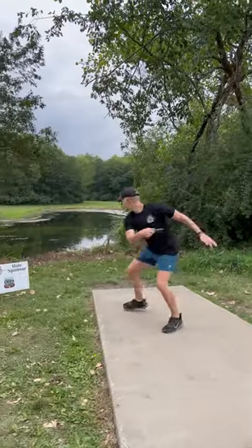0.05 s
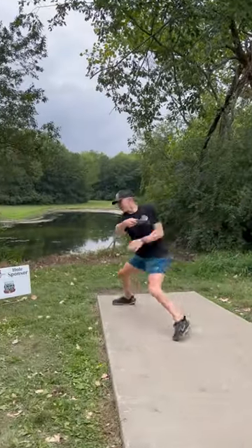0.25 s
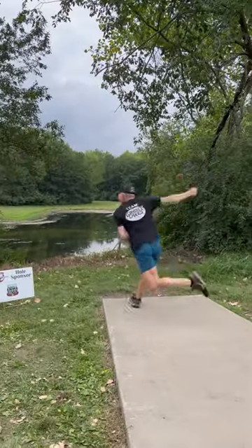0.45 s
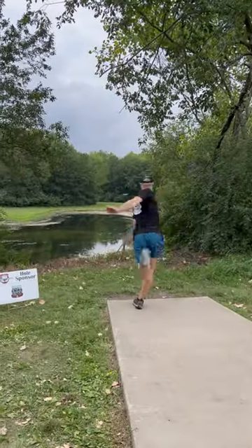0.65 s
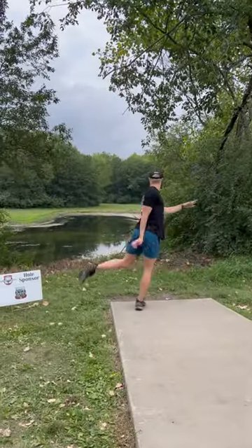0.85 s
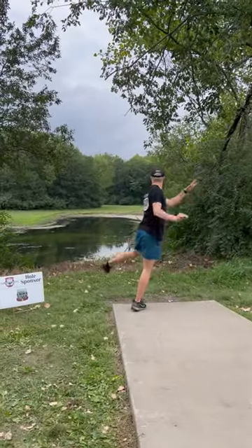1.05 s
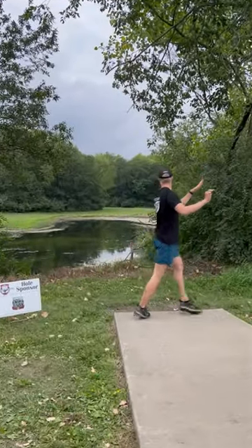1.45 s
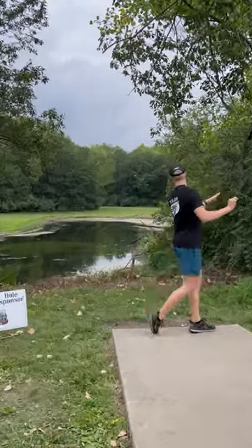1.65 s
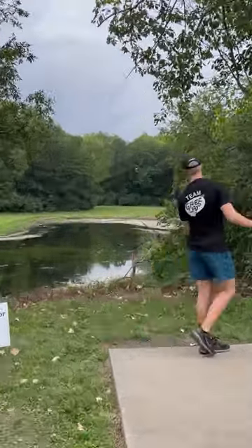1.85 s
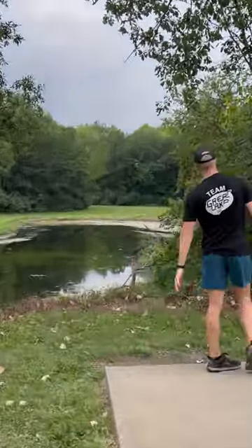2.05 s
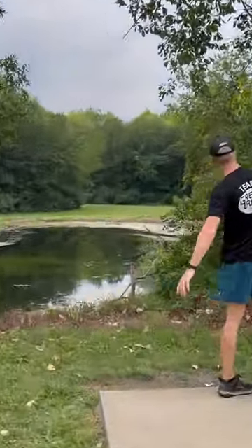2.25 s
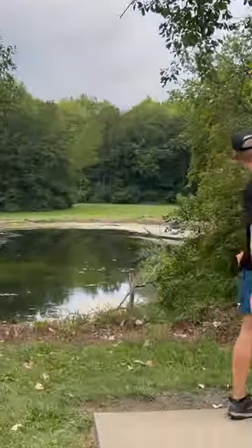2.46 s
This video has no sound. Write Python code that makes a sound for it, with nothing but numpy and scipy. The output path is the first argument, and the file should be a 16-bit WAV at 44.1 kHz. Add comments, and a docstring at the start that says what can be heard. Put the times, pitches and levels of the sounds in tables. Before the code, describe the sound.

A disc throw sounds close by outdoors: at 0.2 seconds a shoe slaps and thumps on concrete, scuffs grittily, and a loud, fast swish of clothing follows at 0.4. Another step slaps and scrapes at 1 second. Light steps and a faint squeak come around 1.5, with softer steps near 2.2. High crickets trill throughout, over a faint distant engine hum and soft moving air.

```python
"""Shoe slaps, gritty scuffs and one fast swish, then light steps and a squeak, over trilling crickets.
A disc thrower plants a foot on a concrete pad by a pond, drags a shoe, whips round and steps off.
Soles slap and thump, rubber rubs over sand, cloth flutters; ground and tree line scatter these sounds.
Cricket wing strokes fill one high band; a far engine hums under low rumble and moving air."""
import sys
import numpy as np
from scipy import signal
from scipy.fft import rfft, irfft, next_fast_len
from scipy.io import wavfile
from scipy.ndimage import map_coordinates

SR = 44100
rng = np.random.default_rng(int(sys.argv[2]) if len(sys.argv) > 2 else 0)


def wav_record(signal):
    """Record a signal, one row per channel, as 16-bit PCM in the file named by sys.argv[1]."""
    frames = np.transpose(np.atleast_2d(signal))
    bounded = np.clip(frames, -1, 1)
    # unit amplitude maps onto the largest positive 16-bit level
    quanta = np.round(bounded * 32767).astype(np.int16)
    wavfile.write(sys.argv[1], SR, quanta)


N = 110250


def amp(db):
    """Decibels to gain."""
    return 10 ** (np.asarray(db) / 20)


def unit(x):
    """Scale to rms 1."""
    return x / np.sqrt(np.mean(x ** 2) + 1e-20)


def along(points, hz):
    """Interpolate (frequency, value) points on a log axis."""
    freqs, values = np.transpose(points)
    return np.interp(np.log(np.maximum(hz, 1e-6)), np.log(freqs), values)


def clock():
    """Sample times [s]."""
    return np.arange(N) / SR


def curves(rows):
    """One value per sample for each column after the time."""
    times_s, *columns = np.transpose(rows)
    return [np.interp(clock(), times_s, column) for column in columns]


def wobble(knots_per_s):
    """Smooth random curve, rms near 1."""
    knots = rng.standard_normal(int(N * knots_per_s / SR) + 4)
    return map_coordinates(knots, [clock() * knots_per_s])


def swell(peak_s, rise_s, fall_s):
    """Bell envelope, peak 1."""
    t = clock() - peak_s
    return np.exp(-(t / np.where(t < 0, rise_s, fall_s)) ** 2)


def filtered(x, response):
    """Apply the gain response(hz)."""
    size = next_fast_len(N + SR // 2)
    return irfft(rfft(x, size) * response(np.fft.rfftfreq(size, 1 / SR)), size)[..., :N]


def noise(spectrum):
    """Coloured noise, rms 1."""
    return unit(filtered(rng.standard_normal(N), lambda hz: amp(along(spectrum, hz))))


def friction(spectrum, scale_hz=1):
    """Tiny random slips over smooth hiss, coloured, rms 1."""
    slips_per_s, slip_share = 3500, .4
    slips = unit(rng.standard_normal(N) * (rng.random(N) < slips_per_s / SR))
    drive = np.sqrt(slip_share) * slips + np.sqrt(1 - slip_share) * rng.standard_normal(N)
    return unit(filtered(drive, lambda hz: amp(along(spectrum, hz / scale_hz))))


def antiphase(x):
    """Stereo side signal."""
    return np.array([x, -x])


def panned(x, pan_db):
    """Pan by a nominal right-over-left level; the top treble stays central."""
    ratio = amp(pan_db)
    depth = [(1200, 1.6), (2000, .8), (3800, 1.2), (5800, 0)]  # (frequency [Hz], pan factor)
    side = filtered(x, lambda hz: (ratio - 1) / (ratio + 1) * along(depth, hz))
    return x - antiphase(side)


def air():
    """Soft wash of moving air, low outdoor rumble and dull rustling."""
    # spectra (frequency [Hz], level [dB])
    wash_spectrum = [(60, -5.5), (180, 5.5), (400, -2), (800, -6), (1500, -12.5), (3000, -19), (5000, -30),
                     (12000, -39)]
    rumble_spectrum = [(15, -35.5), (28, -19.5), (45, -3), (65, 0), (95, -0.5), (140, -8.5), (220, -31),
                       (500, -65)]
    rustle_spectrum = [(60, -5), (200, 7.5), (420, 4), (650, -3), (1000, -42), (3000, -59)]
    wash_levels = [(0.0, -61), (0.25, -63), (0.36, -53), (0.9, -59), (1.22, -65), (2.12, -69), (2.37, -68),
                   (2.5, -62.5)]  # (time [s], level [dB])
    rustles = [(1.55, 0.084, 0.096, -61), (2.279, .13, .25, -59)]  # (peak [s], rise [s], fall [s], level [dB])
    wash_db, = curves(wash_levels)
    wash = noise(wash_spectrum) + amp(-.5) * antiphase(noise(wash_spectrum))
    surge_db = 8.5 * swell(peak_s=.51, rise_s=.17, fall_s=.17)  # around the throw
    rumble = amp(-56.5 + surge_db + 1.1 * wobble(13)) * noise(rumble_spectrum)
    rustle_gain = sum(amp(db) * swell(*timing_s) for *timing_s, db in rustles)
    rustle = rustle_gain * friction(rustle_spectrum)
    return rumble + rustle + amp(wash_db + wobble(9.83)) * wash


def engine():
    """A far engine speeds up, eases off and picks up again."""
    run = [(0, 108.8, -67), (.35, 115.9, -53), (.65, 127.6, -60.5), (.95, 135.8, -58), (1.3, 141.4, -60.5),
           (1.5, 133, -55), (1.8, 110.3, -57), (2.05, 111.8, -60.5), (2.3, 116.2, -54), (2.5, 120, -52)]  # (time [s], pitch [Hz], level [dB])
    overtones = [(2, -24), (3, -27.5)]  # (harmonic number, level [dB])
    hz, db = curves(run)
    phase = 2 * np.pi * np.cumsum(hz) / SR + .16 * wobble(25)
    tone = np.sin(phase) + sum(amp(level_db) * np.sin(k * phase) for k, level_db in overtones)
    return amp(db + .91 * wobble(11)) * unit(tone)


def far_crickets():
    """Single wing strokes stand out of a haze of far trills."""
    haze_spectrum = [(4500, -52), (5600, -28), (6300, -7.5), (6750, 0.5), (7100, 5.5), (7300, 8),
                     (7650, 11.5), (7850, -0.5), (8100, -1), (8350, -31), (8800, -56), (11000, -65.5)]  # (frequency [Hz], level [dB])
    strokes_per_s, spread_s, pitch_hz, scatter_hz = 190, .0055, 7354, 632
    haze = noise(haze_spectrum) + amp(-10.5) * antiphase(noise(haze_spectrum))
    t = np.arange(-1024, 1024) / SR
    bell = np.exp(-(t / spread_s) ** 2)
    strokes = np.zeros(N + SR)
    for when, up, down, faintness in rng.random((int(strokes_per_s * N / SR), 4)):
        hz = pitch_hz + scatter_hz * (up - down)
        strokes[int(when * N):][:len(t)] += amp(-9 * faintness) * bell * np.sin(2 * np.pi * hz * t)
    return amp(-55.5) * haze + amp(-61) * unit(strokes[len(t) // 2:][:N])


def near_crickets():
    """Each wing stroke is a short tone that sags in pitch."""
    trills = [(.15, .3, 7785, 27, -57), (.8, .5, 7115, 27, -61), (1.45, .25, 7480, 27, -60),
              (2.2, .45, 7620, 27, -57)]  # (peak [s], spread [s], pitch [Hz], stroke rate [1/s], level [dB])
    sag_hz, drift_hz, blur_rad = 111, 45, .51
    out = np.zeros(N)
    for peak_s, spread_s, pitch_hz, strokes_per_s, db in trills:
        stroke_rate = strokes_per_s * (1 + .04 * wobble(12))
        stroke_pos = (np.cumsum(stroke_rate) / SR + rng.random()) % 1
        hz = pitch_hz - sag_hz * (stroke_pos - .5) + drift_hz * wobble(25)
        phase = 2 * np.pi * np.cumsum(hz) / SR + blur_rad * wobble(460)
        trill = unit(np.sin(np.pi * stroke_pos) ** 4 * np.sin(phase))
        out += amp(db + 2.3 * wobble(17)) * swell(peak_s, spread_s, spread_s) * trill
    return out


def tree_echo(x):
    """Diffuse answer from the tree line; the mids die first."""
    decay = [(150, 1), (1500, 0.36), (5000, 1), (12000, 0.9)]  # (frequency [Hz], t60 [s])
    hz, t, bins = signal.stft(rng.standard_normal((2, SR)), SR, nperseg=256)
    fade = amp(-60 * t / along(decay, hz)[:, None])
    mid, side = signal.istft(bins * fade, SR, nperseg=256)[1]
    tail = np.array([mid + .316 * side, mid - .45 * side]) / np.linalg.norm(mid)
    return signal.fftconvolve(x.mean(0)[None], tail, axes=1)[:, :N]


def ground_scatter(x):
    """The ground scatters near sounds differently to each side within a few milliseconds."""
    side_spectrum = [(250, -41), (400, -28.5), (620, -8), (1100, -3), (2000, -22), (3600, -4.5),
                     (6500, -14), (11500, 5.5)]  # (frequency [Hz], level [dB])
    delay_s, ripple_s = .003, .001

    def response(hz):
        lag_rad = 2 * np.pi * hz * delay_s + 2 * np.sin(2 * np.pi * hz * ripple_s)
        return np.exp(-1j * lag_rad) * amp(along(side_spectrum, hz))

    return antiphase(filtered(x.mean(0), response))


def squeak():
    """A sole drags with a hoarse resonance that falls as it slows."""
    peak_s, spread_s, pitch_hz, sag_hz_per_s, blur_rad = 1.56, .041, 1478, 6500, 1.5
    hz = pitch_hz - sag_hz_per_s * (clock() - peak_s)
    roughness = 1 + .58 * wobble(500)
    phase = 2 * np.pi * np.cumsum(hz) / SR + blur_rad * wobble(600)
    tone = unit(roughness * np.sin(phase))
    return panned(amp(-53) * swell(peak_s, spread_s, spread_s) * tone, pan_db=1.4)


def scuffs():
    """Rubber rubs dully on concrete while sand rolls brightly under it."""
    # (peak [s], rise [s], fall [s], rub [dB], rub centre [Hz], grit [dB], pan [dB])
    slides = [(.224, 0.02, .016, -46, 1000, -57, 5.5), (0.279, 0.03, 0.028, -36.5, 1070, -52.5, 2),
              (0.307, 0.037, .028, -43, 2370, -40.5, 6), (.52, 0.15, 0.043, -57.5, 1400, -60, 7),
              (.80, 0.067, 0.12, -59.5, 1300, -65, 2), (0.948, 0.029, 0.067, -45.5, 1130, -58, 3),
              (1.59, .05, .035, -56, 1053, -75.5, 2), (1.688, 0.028, 0.024, -56, 1610, -61, 0),
              (2.215, 0.041, 0.036, -67, 1546, -78.5, -2), (2.49, 0.03, .05, -77, 1600, -85, -11)]
    rub_spectrum = [(.1, -10), (.3, -5.5), (.48, -7), (.72, -1), (1, -1.5), (1.35, -4), (1.9, -6.5),
                    (3, -11), (4, -20.5), (9, -63.5)]  # (multiple of the centre, level [dB])
    grit_spectrum = [(300, 0), (1500, -16), (3600, 2.5), (4700, -13.5), (5600, 6), (8500, -3.5),
                     (12000, -2.5)]  # (frequency [Hz], level [dB])
    out = np.zeros((2, N))
    for peak_s, rise_s, fall_s, rub_db, centre_hz, grit_db, pan_db in slides:
        rub = amp(rub_db) * friction(rub_spectrum, centre_hz)
        grit = amp(grit_db) * friction(grit_spectrum)
        out += panned(swell(peak_s, rise_s, fall_s) * (rub + grit), pan_db)
    return out


def thump(start_s, hz, rise_s):
    """Soft push of two or three cycles."""
    t = np.maximum(clock() - start_s, 0)
    return (t / rise_s) ** 2 * np.exp(2 * (1 - t / rise_s)) * np.sin(2 * np.pi * hz * t)


def sole_slap(t):
    """Damped sole modes of alternating sign, varied for each landing."""
    modes = [(742, -9, 0.025), (982, -2, 0.017), (1265, -6, 0.016), (1570, -19.5, 0.032),
             (3620, -23.5, 0.042)]  # (frequency [Hz], level [dB], t60 [s])
    out = np.zeros(N)
    for k, (hz, db, t60_s) in enumerate(modes):
        envelope = amp(db + rng.normal(0, 1) - 60 * t / t60_s)
        detune = 1 + rng.normal(0, .014)
        out += (-1) ** k * envelope * np.sin(2 * np.pi * hz * detune * t)
    return out


def grit_tick(t, corner_hz, t60_s=.04):
    """Grit cracks under a shoe: a friction burst, dulled above the corner."""
    spectrum = [(100, -16), (350, 8), (600, -5), (1500, 5.5), (3200, -1), (4600, -3.5), (6200, 0),
                (12000, -5.5)]  # (frequency [Hz], level [dB])
    burst = (t > 0) * amp(-60 * t / t60_s) * friction(spectrum)
    return filtered(burst, lambda hz: 1.36 / np.sqrt(1 + (hz / corner_hz) ** 8) + .05)


def steps():
    """Each landing slaps the sole, thumps softly and cracks a little grit."""
    # (time [s], slap [dB], thump [dB], tick [dB], tick corner [Hz], pan [dB])
    landings = [(.204, -31, -42, -34, 2338, 5.5), (0.2214, -24, -28.5, -33, 1776, 5),
                (0.9826, -28, -67, -36.5, 4105, 3.5), (1.343, -73, -84, -55, 3870, 2),
                (1.467, -53, -44, -47.5, 2700, -3), (1.475, -50, -67, -54, 2700, 14),
                (1.604, -56, -67, -47.5, 3270, -1), (1.662, -52, -67, -56, 11000, -1),
                (2.17, -64, -73, -54, 4300, 0), (2.175, -63, -58, -49.5, 4500, 0),
                (2.221, -52.5, -51, -65, 2530, 12)]
    plant = amp(-27) * thump(start_s=.207, hz=139, rise_s=.0041)  # full weight on the front foot
    out = np.array([plant, plant])
    for start_s, slap_db, thump_db, tick_db, corner_hz, pan_db in landings:
        t = np.maximum(clock() - start_s, 0)
        slap = amp(slap_db) * sole_slap(t)
        push = amp(thump_db) * thump(start_s, hz=258, rise_s=.0017)
        tick = amp(tick_db) * grit_tick(t, corner_hz)
        out += panned(slap + push + tick, pan_db)
    return out


def throw():
    """One fast, fluttering swish of cloth and twisting shoe as the body whips round."""
    levels = [(.34, -72), (.362, -39.5), (.38, -27.5), (.39, -28.5), (.408, -23), (.422, -25.5),
              (.438, -27.5), (.452, -45.5), (.48, -62), (.52, -110)]  # (time [s], level [dB])
    spectrum = [(59, -48.5), (100, -17), (217, -16), (378, -6.5), (520, -17), (1150, -4.5), (1370, 3),
                (1710, -3), (2130, -9.5), (2440, -9.5), (3640, -17), (4610, -26), (4900, -25), (5970, -21),
                (11500, -36.5), (15000, -68), (22000, -120)]  # (frequency [Hz], level [dB])
    start_s, flutter_hz = levels[0][0], 120
    db, = curves(levels)
    flutter_db = np.sin(2 * np.pi * flutter_hz * clock() + .59 * wobble(80))
    envelope = (clock() > start_s) * amp(db + flutter_db)
    return panned(envelope * friction(spectrum), pan_db=3)


def scene():
    """Thrower in front; crickets, engine and air behind."""
    thrower = steps() + scuffs() + squeak() + throw()
    reflections = ground_scatter(thrower) + amp(-19) * tree_echo(thrower)
    return thrower + reflections + near_crickets() + far_crickets() + engine() + air()


def record(dry):
    """Microphone pair: mono in the bass, wider above, band-limited."""
    width = [(370, 0), (620, 1.4), (1400, 1.18)]  # (frequency [Hz], side gain)
    top_hz = 12250
    side = filtered((dry[0] - dry[1]) / 2, lambda hz: along(width, hz))
    return filtered(dry.mean(0) + antiphase(side), lambda hz: hz < top_hz)


dry = scene()
out = record(dry)
wav_record(out)
```